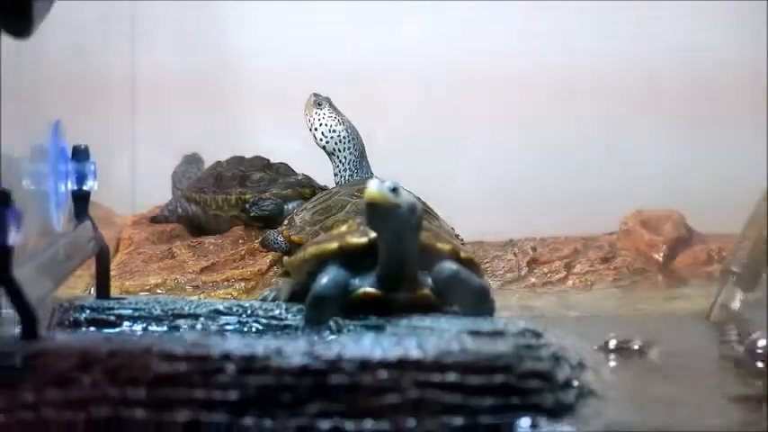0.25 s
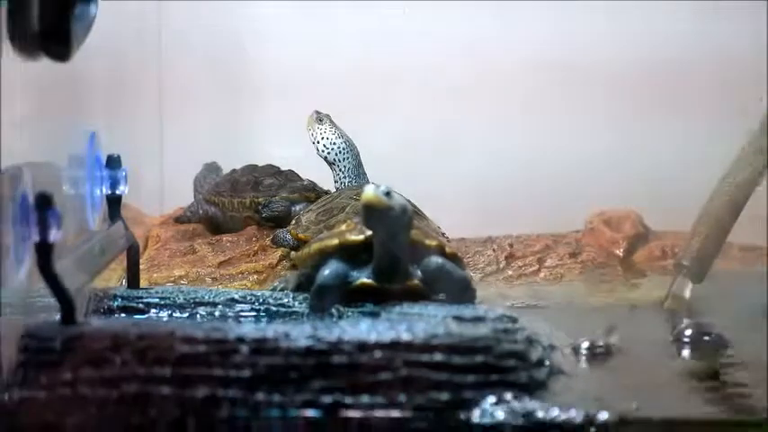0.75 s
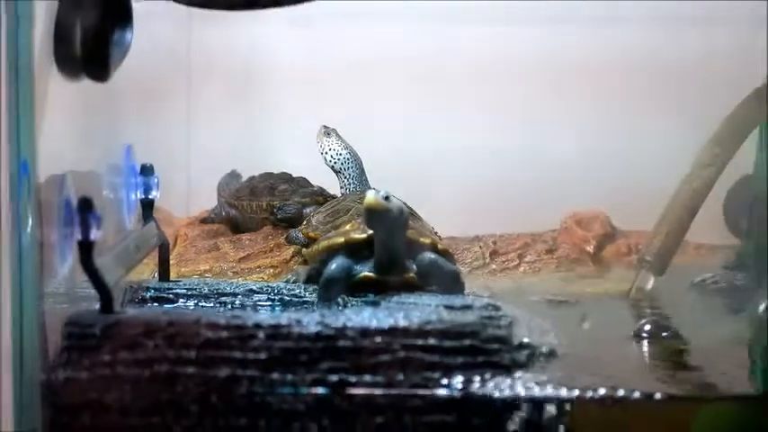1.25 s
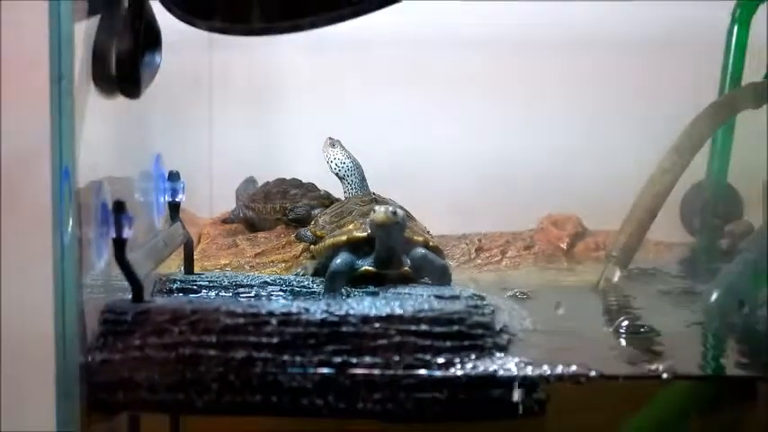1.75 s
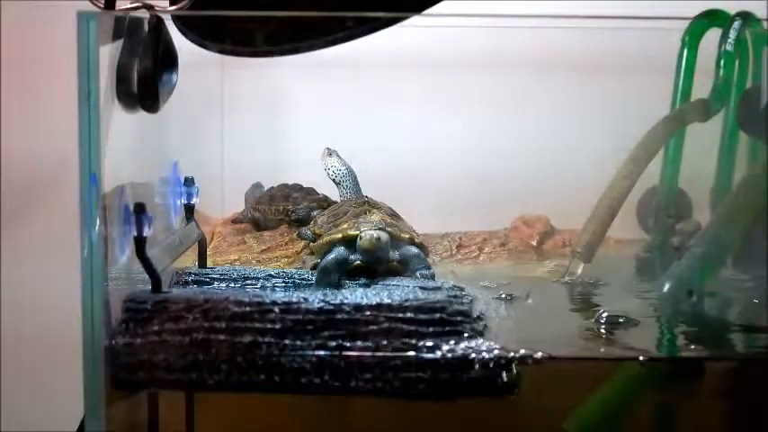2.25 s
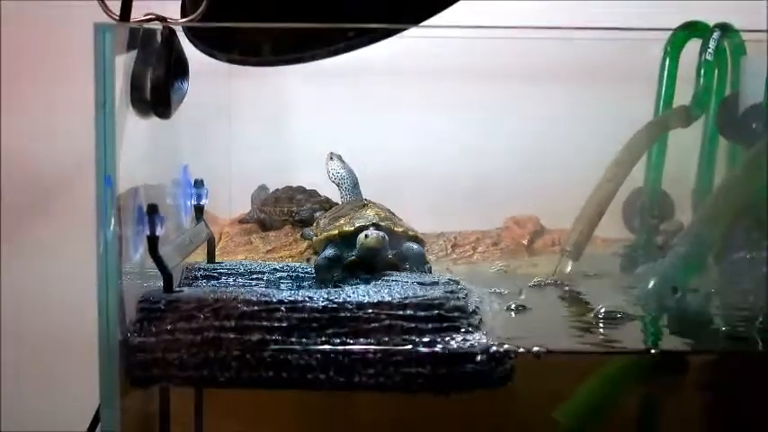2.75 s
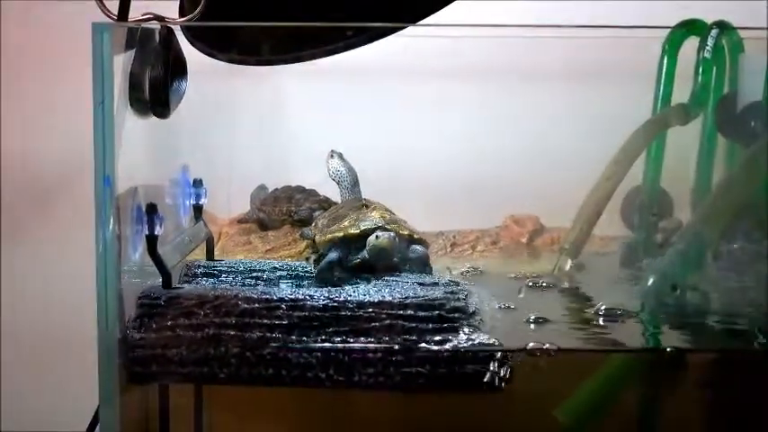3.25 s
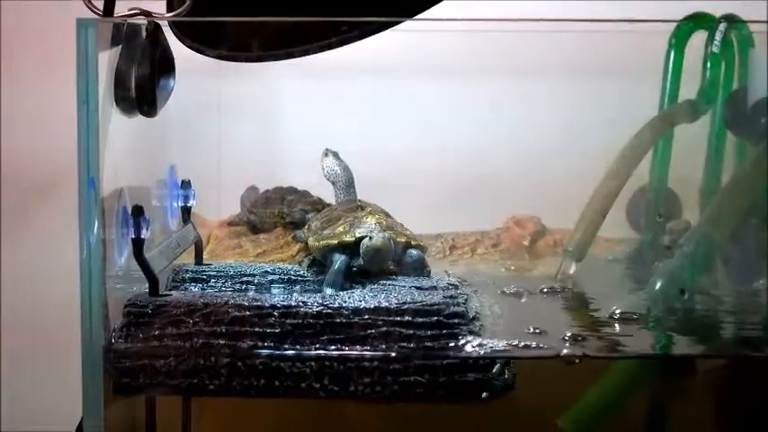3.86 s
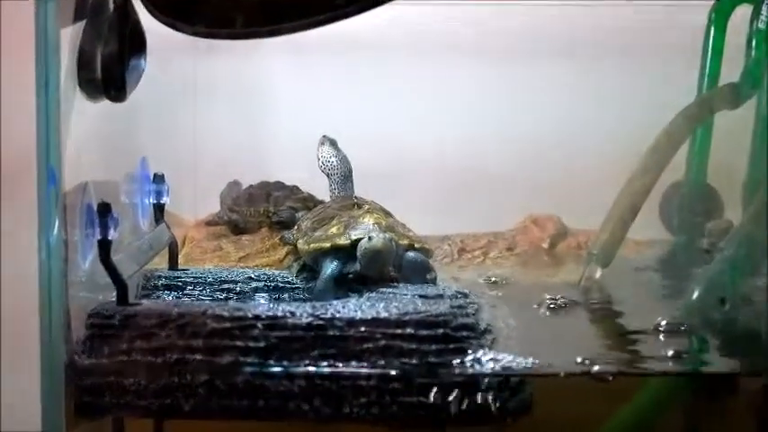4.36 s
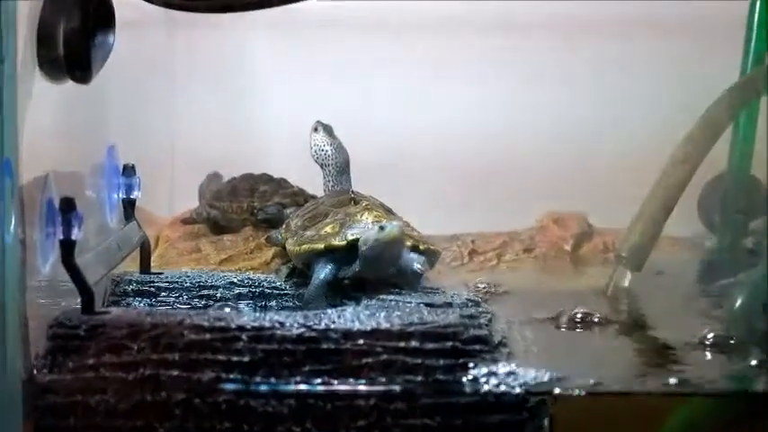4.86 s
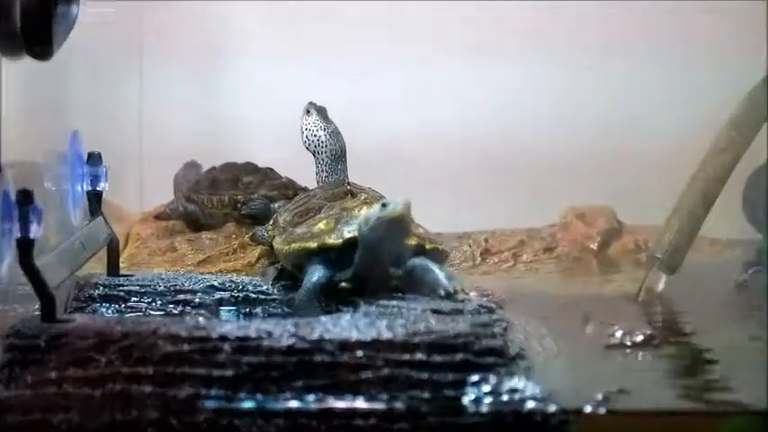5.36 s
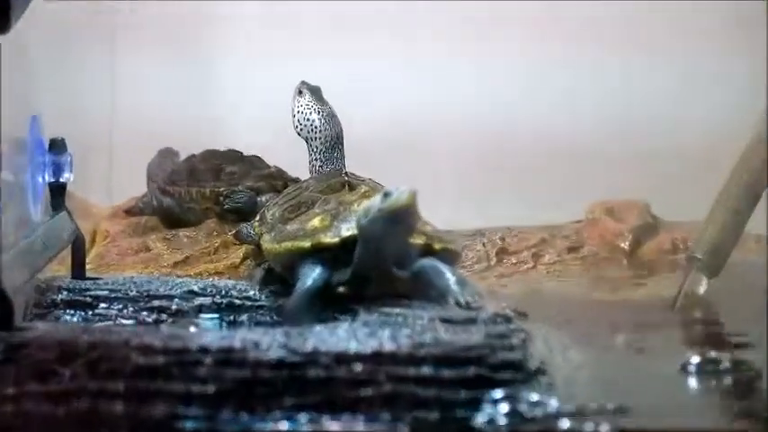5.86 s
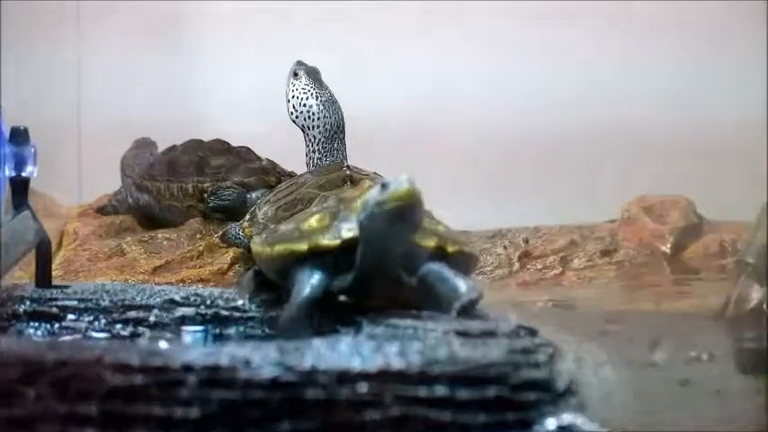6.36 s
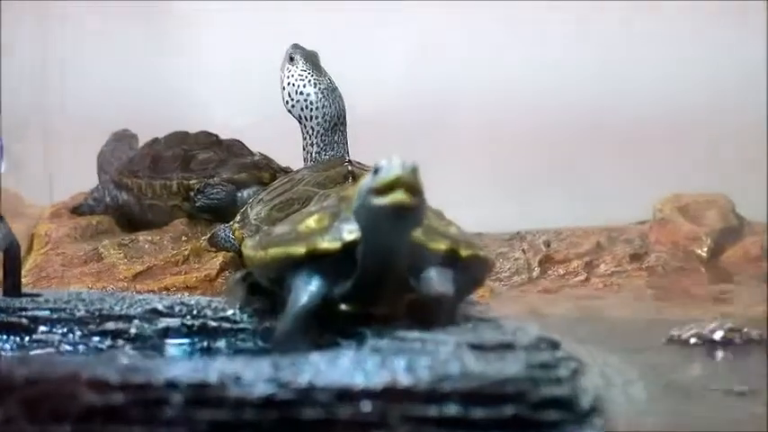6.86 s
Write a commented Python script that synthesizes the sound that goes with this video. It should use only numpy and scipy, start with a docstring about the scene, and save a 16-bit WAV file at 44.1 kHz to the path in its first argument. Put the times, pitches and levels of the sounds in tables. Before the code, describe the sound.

Indoors, close to a glass turtle tank, a filter stream pours continuously into water. A low pump hum and soft rumble lie under a wash of trickling, hollow bubble plops and bright tiny plinks. Droplets tick and patter, froth fizzes. Around the middle the splashing surges, the sound dips for an instant, and one hard dry click follows; then the trickle simply carries on.

```python
"""Filter stream in a glass turtle tank

Indoors, a filter returns water to the tank over the mains hum of its pump and a thin electrical whine.
Shaped noise makes the rumble and wash; trapped bubbles ring as short gliding tones that echo in the glass.
Droplets tick and patter as tiny damped impacts, and froth sprays bursts of crackling hiss.
Midway the sound drops out for a moment, and a sharp click, a cluster of damped tones, follows."""
import sys
import numpy as np
from scipy import signal
from scipy.fft import rfft, irfft
from scipy.io import wavfile
from scipy.ndimage import uniform_filter1d

SR = 44100
rng = np.random.default_rng(int(sys.argv[2]) if len(sys.argv) > 2 else 0)


def unload_wav(signal):
    """Save mono or channel-first audio to the path in sys.argv[1] as 16-bit WAV at rate SR, clipped to [-1, 1]."""
    wavfile.write(
        sys.argv[1],
        SR,
        np.round(np.clip(np.atleast_2d(signal).T, -1, 1) * 32767).astype(np.int16),
    )


N = 313110  # length in samples

# pump hum: mains_multiple, level_db, left_minus_right_db, waver_db
HUM_HARMONICS = [(1, -61.5, 22, 2), (2, -53, 0, 0.76), (4, -56.5, 2.5, -0.4), (5, -67, -4, -1.5),
                 (6, -61.5, -26, .5), (7, -49, 3, 0.5), (8, -67.5, 9, .5), (9, -62, -33, -1),
                 (10, -54, -1, 1.6), (11, -57.5, 6, 1), (12, -59.5, -13, .5), (14, -58, -1.5, 0.2)]
MAINS_HZ, WHINE_HZ = 59.99, 15734
# strength of the splashing over time: time_s, strength_db
SPLASH_STRENGTH = [(0, 2), (.8, 0.9), (1.5, 1.2), (2.8, 1.1), (3.5, 4.5), (3.68, 1), (4.4, 0.65),
                   (5.9, 2.1), (6.55, 0.5), (7.1, 0.5)]
# colour of the filter and room rumble: frequency_hz, relative_density_db (per Hz)
RUMBLE_COLOUR = [(20, -40), (55, 2), (90, -8.5), (155, 3), (200, -1), (250, 0.5), (340, -5), (460, -7),
                 (550, -5), (625, -7.5), (700, -1.5), (765, -15), (832, -1.5), (885, -10.5), (980, -8),
                 (1300, -12.5), (2500, -36.5)]
# colour of the churning water before the tank resonances: frequency_hz, relative_density_db (per Hz)
CHURN_COLOUR = [(100, -10), (400, -3.5), (780, -3.5), (1150, 1.5), (1450, -4), (2200, -2.5), (2550, -8),
                (2950, -13.5), (3300, -16), (4000, -10.5), (5200, -12.5), (6400, -9), (9000, -11.5),
                (12700, -16), (13800, -50), (16000, -35)]
# resonances of the air space in the tank: centre_hz, width_hz, lift_db
TANK_RESONANCES = [(1220, 75, 1), (1703, 94, 5.5), (2090, 97, 3), (2520, 120, 2.5)]
# likeness of the two noise channels: frequency_hz, correlation (-1 to 1)
CHANNEL_LIKENESS = [(60, -0.62), (160, -0.64), (280, -0.65), (450, -0.26), (1400, 0.064), (3100, 0.68),
                    (5000, 0.41), (6800, -0.038), (15000, -0.17)]
# side from which the churning water is heard: frequency_hz, left_minus_right_db
WATER_SIDE = [(300, 13.5), (1100, -1), (2100, 0), (3100, 0), (4000, 1), (6500, 0.5), (10000, -3.5),
              (12000, -3), (14000, 37)]
# strength of the dull patter of drops: time_s, level_db
PATTER_LEVEL = [(0, -57), (1.2, -66), (2.8, -60), (3.3, -59.5), (6.4, -58), (7.1, -78)]
# side from which the lesser bubbles are heard: pitch_hz, left_minus_right_db
BUBBLE_SIDE_BY_PITCH = [(1000, 12), (1700, 7), (2400, 1), (5500, 0), (10000, -2.5)]
# the loudest bubbles: start_s, pitch_hz, relative_level_db, left_minus_right_db, t60_s
LOUD_BUBBLES = [(.057, 1970, -54, 5, .06), (.133, 1660, -50.5, 4, .1), (.187, 5600, -50, -2, 0.21),
                (.336, 8760, -57, -5, 0.17), (.504, 7260, -57, -1, .15), (.737, 1650, -54, 8, 0.084),
                (.807, 2090, -51, 1, 0.14), (.815, 1216, -48, 4, 0.084), (.997, 5830, -52, 1, 0.17),
                (1.088, 1515, -56, 4, .08), (1.418, 4980, -55, 0, .2), (1.539, 1690, -54, 3, 0.065),
                (1.555, 2030, -55, 4, .06), (1.563, 1174, -46, 1, 0.15), (1.593, 5030, -58, 4, 0.14),
                (1.661, 1730, -54, 6, 0.11), (1.803, 4610, -55, 1, 0.21), (1.851, 5850, -51.5, -1, 0.18),
                (1.899, 1555, -54, 2, 0.1), (1.927, 1163, -48, 6, .12), (2.146, 2360, -53, 5, .07),
                (2.39, 1640, -47.5, 8, 0.093), (2.477, 11350, -56, 1, 0.17), (2.509, 2430, -47.5, 7, 0.061),
                (2.543, 1220, -50, 2, 0.12), (2.591, 2085, -51.5, 0, 0.088), (2.777, 1167, -48, 7, .13),
                (2.7915, 1000, -45.5, 1, 0.043), (2.826, 1700, -49.5, 6, 0.053), (2.828, 6910, -56, 0, .2),
                (2.848, 5840, -55, 2, .17), (3.006, 1990, -55, 1, .07), (3.04, 4700, -58, -2, .17),
                (3.116, 11760, -58, -1, .15), (3.133, 1632, -40, 5, 0.065), (3.168, 4920, -54, -1, .17),
                (3.184, 2040, -49.5, 0, .12), (3.309, 2120, -51, 4, 0.083), (3.321, 4840, -54, 1, 0.2),
                (3.343, 1205, -46, 6, 0.2), (3.431, 1650, -53, 7, 0.099), (3.433, 2130, -53, 3, 0.12),
                (3.506, 1200, -38, 7, 0.08), (3.524, 1197, -44.5, 3, .06), (3.67, 1280, -53.5, 0, 0.016),
                (3.676, 10500, -50.5, 1, 0.16), (3.886, 8900, -49.5, -3, 0.22),
                (4.2535, 1133, -43, 5, 0.07), (4.268, 1110, -43.5, 0, .07), (4.453, 2150, -50, 1, 0.29),
                (4.539, 2100, -44.5, 2, 0.18), (4.7, 2060, -58, 6, .1), (4.742, 11600, -54, 0, .2),
                (4.804, 8720, -56, -3, 0.17), (4.941, 10500, -54.5, -2, .2), (5.118, 5840, -52.5, 1, .17),
                (5.261, 5360, -53, -1, 0.19), (5.263, 8860, -56, -4, 0.17), (5.307, 1660, -49, 5, 0.15),
                (5.353, 1950, -50, 2, .1), (5.369, 2400, -54, 8, 0.089), (5.586, 1220, -52.5, 2, .16),
                (5.758, 6800, -55, 1, .18), (5.945, 6350, -55.5, 1, 0.25), (5.957, 2060, -53, 7, 0.084),
                (6.032, 1670, -47, 6, .1), (6.047, 5960, -53, 1, 0.12), (6.065, 10750, -55.5, -3, 0.19),
                (6.091, 1660, -52, 11, 0.14), (6.322, 1235, -48, 4, 0.13), (6.323, 1676, -45.5, 9, 0.085),
                (6.355, 2070, -49.5, 1, .12), (6.519, 1670, -48.5, 7, 0.11), (6.638, 997, -43.5, 2, 0.15),
                (6.678, 4930, -51.5, -2, 0.19), (6.724, 10000, -47.5, -3, 0.24), (6.807, 2030, -55, 1, .09),
                (6.821, 4060, -57, 3, 0.15), (6.885, 820, -43, 6, 0.086), (6.907, 830, -43.5, 1, .08),
                (6.959, 4970, -58, 1, 0.17)]
# the loudest droplet ticks: start_s, relative_level_db, pitch_hz, spatter_strength (0 to 1)
LOUD_TICKS = [(0.176, -36, 4400, .4), (0.2255, -36.5, 2600, 0.6), (0.4085, -37, 2380, .8),
              (.434, -40, 2400, .3), (.458, -39.5, 2400, .2), (0.9515, -37, 2400, .5),
              (1.825, -36, 5500, .5), (2.469, -33, 7000, 0.2), (2.476, -34, 7400, .4),
              (3.6632, -39, 3800, 1), (3.685, -43, 2200, .3), (3.937, -39, 2400, .5),
              (4.007, -39, 2200, .1), (4.054, -37, 2200, .2), (4.156, -35.5, 1900, 0.3),
              (4.208, -35, 2100, .1), (4.3055, -37, 2100, 0), (4.713, -37, 2090, .1),
              (4.7568, -38, 2200, .1), (4.819, -39, 2200, .1), (5.773, -41, 2200, .2),
              (5.828, -38, 2300, .1), (5.85, -40, 2270, .1), (5.8768, -34.5, 2300, 0.4),
              (5.9063, -38, 2200, .1), (5.9432, -38, 2300, .1), (5.9665, -40, 2600, .1), (6, -42, 2300, .1)]
# short sprays of fine droplets: start_s, level_db, centre_hz, t60_s
FROTH_SPRAYS = [(0.187, -48, 5670, .22), (0.675, -51, 5000, .24), (1.85, -52, 9000, .24),
                (2.165, -52.5, 8000, 0.26), (2.457, -46, 7400, 0.16), (2.95, -56, 9000, .3),
                (3.04, -50.5, 5000, .24), (3.135, -52, 9000, .15), (3.168, -48, 4400, .24),
                (3.176, -52, 11000, .12), (3.29, -51, 3600, .24), (3.32, -51, 7000, .24),
                (3.617, -50, 11000, .3), (3.66, -49, 12000, .08), (3.674, -42, 12500, .07),
                (3.684, -47, 14500, .06), (3.729, -41, 11500, 0.033), (4.105, -52, 8000, 0.26),
                (5.7, -54, 7500, .4), (5.95, -55, 9000, .24), (6.674, -51, 9000, .24)]
# ringing parts of the sharp click: pitch_hz, relative_level_db, t60_s
CLICK_RINGS = [(880, -39.5, 0.016), (1300, -38, 0.011), (1750, -41, 0.013), (2180, -38, 0.011),
               (3920, -31, 0.0058), (5750, -43, 0.006), (7140, -39.5, 0.005)]
CLICK_S = 3.7368
# the momentary dropout: start_s, end_s
DROPOUT_SPAN = (3.548, 3.617)
CUTOFF_HZ = 15950


def amp(db):
    """Decibels to gain."""
    return 10 ** (np.asarray(db) / 20)


def unit(x):
    """Scales to rms 1."""
    return x / np.sqrt(np.mean(x ** 2) + 1e-20)


def read(points, hz):
    """Reads a table on a log-frequency axis."""
    f, value = np.transpose(points)
    return np.interp(np.log(hz + 1), np.log(f + 1), value)


def curve(rows):
    """Joins rows of (time_s, value) by straight lines."""
    return np.interp(np.arange(N) / SR, *np.transpose(rows))


def pan(left_minus_right_db):
    """Left and right gains of equal total power."""
    return unit(amp([[left_minus_right_db / 2], [-left_minus_right_db / 2]]))


def add(mix, start_s, sound):
    """Adds a stereo sound to the mix at its start time."""
    part = mix[:, max(round(start_s * SR), 0):][:, :sound.shape[1]]
    part += sound[:, :part.shape[1]]


def drift(top_hz, count=24):
    """Random wander of rms 1: sines over a decade up to top_hz, the slower ones stronger."""
    t = np.linspace(0, N / SR, 1500)
    f = np.geomspace(top_hz / 10, top_hz, count)[:, None]
    sines = np.sin(2 * np.pi * (f * t + rng.random((count, 1))))
    wave = (sines / np.sqrt(f)).sum(0)
    return unit(np.interp(np.arange(N) / SR, t, wave))


def noise(colour_db, patchy_db, size):
    """Coloured stereo noise, with time-frequency patches that come and go in both channels."""
    hz = np.fft.rfftfreq(size, 1 / SR)
    a, b, c, d, patches = rng.standard_normal((5, len(hz), 4 * N // size + 5))
    patches = uniform_filter1d(patches, size=12, axis=0)  # smooth across frequency
    patches = unit(uniform_filter1d(patches, size=10, axis=1))  # and across time
    same = np.clip(read(CHANNEL_LIKENESS, hz), -1, 1)[:, None]
    left = a + 1j * b
    right = same * left + np.sqrt(1 - same ** 2) * (c + 1j * d)
    spectrum = np.array([left, right]) * amp(colour_db(hz)[:, None] + patchy_db * patches)
    return unit(signal.istft(spectrum, nperseg=size, noverlap=size * 3 // 4)[1][:, :N])


def echoes(sound, t60, direct):
    """A direct sound and its dense reflections from glass and water, different at each ear."""
    t = np.arange(SR // 5) / SR
    walls = rng.standard_normal((2, len(t))) * amp(-60 * t / t60)
    walls /= np.linalg.norm(walls, axis=1, keepdims=True)
    walls[:, 0] += direct
    return signal.fftconvolve(sound[None], walls, axes=1)


def bubble(hz, cycles=10.8, shrink=0.99, rise=0.11, t60=0.21, direct=0.45, shade_hz=1800):
    """A trapped bubble swells and rings briefly (small ones for fewer cycles), its pitch rising."""
    t = np.arange(SR // 20) / SR
    age = t * hz / (cycles * min(1, 1700 / hz) ** shrink)  # in decay times
    glide_hz = hz * (1 + rise * (np.tanh(age / 2) - .35))
    swell = 1 - np.exp(-2 * age)
    ring = np.exp(-age) * swell * np.sin(2 * np.pi * np.cumsum(glide_hz) / SR)
    # the rim of the tank shades the direct treble
    heard = echoes(ring, t60, direct * min(1, shade_hz / hz) ** 2)
    return heard / np.linalg.norm(heard, axis=1, keepdims=True)  # energy 1 per ear


def tick(hz, cycles=1.0, knock_share=0.23, t60=0.19, direct=0.7):
    """A tiny impact: a damped snap, a decaying 1800 Hz knock and a faint echo; peak 1."""
    t = np.arange(SR // 100) / SR
    snap = np.exp(-t * hz / cycles) * np.sin(2 * np.pi * hz * t)
    knock = knock_share * np.exp(-t / 0.00092) * np.sin(2 * np.pi * 1800 * t)
    onset = 1 - np.exp(-2 * t * hz)
    heard = echoes((snap + knock) * onset, t60, direct)
    return heard / abs(heard).max()


def scatter(grain, per_s, spread_db):
    """Repeats a grain at random moments; most are small, a few large; rms 1."""
    count = N // 100
    place, chance, size, side = rng.random((4, count))
    kept = chance < per_s * N / SR / count
    height = amp(spread_db * np.minimum(-np.log(size), 3)) * kept
    train = np.zeros((2, N))
    train[:, (place * N).astype(int)] = height * np.array([np.sqrt(0.16 + side), np.sqrt(1.2 - side)])
    return unit(signal.oaconvolve(train, grain, axes=1)[:, :N])


def spatter(decay_s, low_hz, high_hz):
    """The broad snap of an impact: band-passed noise, a little different at each ear; peak 1."""
    t = np.arange(SR // 100) / SR
    rush = rng.standard_normal(len(t)) + .5 * rng.standard_normal((2, len(t)))
    band = signal.butter(1, [low_hz, min(high_hz, SR / 2.2)], "band", fs=SR)
    snap = signal.lfilter(*band, rush * t / decay_s * np.exp(-t / decay_s))
    return snap / abs(snap).max()


def water_db(hz):
    """Spectrum of the water, lifted at the resonances of the tank."""
    lift = sum(db / (1 + (2 * (hz - f) / width) ** 2) for f, width, db in TANK_RESONANCES)
    return read(CHURN_COLOUR, hz) + lift


def lean(hz):
    """Left and right gains for the water at these pitches."""
    return amp(np.array([.5, -.5])[:, None] * read(WATER_SIDE, hz))


def pump(left_lead_rad=0.99):
    """Mains harmonics from the pump, wavering a little."""
    t, out = np.arange(N) / SR, np.zeros((2, N))
    for order, db, side_db, waver_db in HUM_HARMONICS:
        phase = 2 * np.pi * (order * MAINS_HZ * t + rng.random()) + np.array([[left_lead_rad], [0]])
        out += amp(db + waver_db * drift(6.8)) * pan(side_db) * np.sin(phase)
    return np.sqrt(2) * out  # sine peaks to rms levels


def whine(level_db=-79):
    """A thin, steady electrical whine: one high sine, equal in both channels."""
    t = np.arange(N) / SR
    return np.sqrt(2) * amp(level_db) * np.sin(2 * np.pi * WHINE_HZ * t)


def rumble(level_db=-45.0, follow=0.3):
    """Low rush of the filter and the falling stream, swelling a little with the splashing."""
    rush = noise(lambda hz: read(RUMBLE_COLOUR, hz), patchy_db=1.2, size=2048)
    return amp(level_db + follow * curve(SPLASH_STRENGTH)) * rush


def swarm(pitches_hz, per_s, spread_db):
    """Scattered bubbles at many pitches, weighted by the colour and side of the water; rms 1."""
    total = 0
    for hz in pitches_hz:
        weight = amp(water_db(hz)) * np.sqrt(hz) * lean(hz)
        total = total + weight * scatter(bubble(hz), per_s, spread_db)
    return unit(total)


def trickle(wash_db=-52.5, gurgle_db=-57, fizz_db=-61, spray_db=-65,
            low_follow=0.78, surge_db=0.54, flutter_db=1.0):
    """The stream churns the surface: a wash, swarms of large and small bubbles, and spray."""
    flow_db = curve(SPLASH_STRENGTH) + surge_db * drift(12)
    wash = noise(water_db, patchy_db=2.0, size=512)
    wash = irfft(rfft(wash) * lean(np.fft.rfftfreq(N, 1 / SR)), N)
    gurgle = swarm(np.geomspace(750, 2600, num=20), per_s=7, spread_db=2.0)
    fizz = swarm(np.geomspace(3500, 13000, num=26), per_s=16, spread_db=4.5)
    spray_hz = np.geomspace(4200, 11000, num=8)
    spray = unit(sum(scatter(tick(hz, direct=0.81), per_s=46, spread_db=4.5) for hz in spray_hz))
    deep = amp(wash_db) * wash + amp(gurgle_db) * gurgle
    bright = amp(fizz_db) * fizz + amp(spray_db) * spray
    flutter = amp(flutter_db * drift(50))  # the stream lands in uneven lumps
    return flutter * (amp(low_follow * flow_db) * deep + amp(flow_db) * bright)


def patter(side_db=4):
    """Drops land with dull little knocks, each a short damped tone."""
    pitches_hz = np.geomspace(1500, 2400, num=5)
    drops = sum(scatter(tick(hz, cycles=2.1, knock_share=0), per_s=12, spread_db=2.5) for hz in pitches_hz)
    return amp(curve(PATTER_LEVEL)) * pan(side_db) * unit(drops)


def bubbling(low_hz=946.4, high_hz=2362, per_s=34, level_db=-62.5, spread_db=3.5, count=290):
    """Lesser bubbles overlap at loosely even intervals, louder when the splashing is strong."""
    out, flow_db = np.zeros((2, N)), curve(SPLASH_STRENGTH)
    wait, size, strength = rng.random((count, 3)).T
    starts_s = np.cumsum(2 * wait) / per_s
    pitches_hz = low_hz * (high_hz / low_hz) ** size
    offsets_db = spread_db * (2 * strength - 1)
    for s, hz, db in zip(starts_s, pitches_hz, offsets_db):
        if s < N / SR:
            ring = bubble(hz, cycles=17.2, rise=0.052, direct=1.5, t60=0.16)
            gain = amp(level_db + db + flow_db[int(s * SR)]) * np.sqrt(SR / 20)  # level over 50 ms
            add(out, s, gain * pan(read(BUBBLE_SIDE_BY_PITCH, hz)) * ring)
    return out


def plinks(level_db=-2.0, clear=0.35, shade_hz=2700, deep_hz=1550, swell_s=0.0027, rise=0.018,
           echo_cycles=8, width=0.85):
    """Single bubbles stand out: a rising note in echoes, tiny ones mostly echo, the biggest broad gulps."""
    out, t = np.zeros((2, N)), np.arange(SR // 5) / SR
    for s, hz, db, side_db, t60 in LOUD_BUBBLES:
        glide_hz = hz * (1 + rise * (np.tanh(10 * t / t60) - .5))
        envelope = amp(-60 * t / t60) * (1 - np.exp(-t / swell_s))
        note = envelope * np.sin(2 * np.pi * np.cumsum(glide_hz) / SR)
        tight = min(1, hz / deep_hz) ** 1.4  # big bubbles ring for fewer cycles
        echo = bubble(hz, cycles=echo_cycles * tight, shrink=0.76, t60=t60, direct=0.17)
        middle, side = echo[:, :len(t)]
        blur = np.array([middle + width * side, middle - width * side])
        share = np.clip(clear * tight * min(1, shade_hz / hz) ** 2.2, 0, 1)  # power of the clear note
        heard = unit(np.sqrt(share) * unit(note) + np.sqrt(1 - share) * unit(blur))
        gain = amp(level_db + db) * np.sqrt(SR / 20 / len(t))  # energy referred to 50 ms
        add(out, s, gain * pan(side_db) * heard)
    return out


def ticks(level_db=-0.5, side_db=5.0, cycles=1.9, snap_hz=2400):
    """Single droplets strike close by: a brief ring, and a thin broad spatter when they burst."""
    out = np.zeros((2, N))
    for s, db, hz, burst in LOUD_TICKS:
        gain = amp(level_db + db) * pan(side_db)
        add(out, s, gain * tick(hz, cycles=cycles * min(1, snap_hz / hz), knock_share=0.19, direct=1.4))
        add(out, s, gain * burst * spatter(decay_s=0.0009, low_hz=2500, high_hz=8000))
    return out


def sprays(octaves=0.57, rise_s=0.00095, crackle_db=4):
    """Bursting froth throws up a crackling hiss, band-shaped noise that dies away in the tank."""
    out, t = np.zeros((2, N)), np.arange(SR // 5) / SR
    hz = np.fft.rfftfreq(len(t), 1 / SR) + 1
    for s, db, centre_hz, t60 in FROTH_SPRAYS:
        colour = np.exp(-.5 * (np.log2(hz / centre_hz) / octaves) ** 2)
        crackle = amp(crackle_db * unit(uniform_filter1d(rng.standard_normal(len(t)), size=30)))
        hiss = unit(irfft(rfft(crackle * rng.standard_normal((2, len(t)))) * colour))
        add(out, s, amp(db - 60 * t / t60) * (1 - np.exp(-t / rise_s)) * hiss)
    return out


def click(level_db=6.0, side_db=3, rise_s=0.00019, direct=1.1, snap_db=-26):
    """One hard, dry click very near: a broad noise snap and a short ring of damped tones."""
    out, t = np.zeros((2, N)), np.arange(SR // 20) / SR
    ring = np.zeros(len(t))
    for k, (hz, db, t60) in enumerate(CLICK_RINGS):
        ring += (-1) ** k * amp(db - 60 * t / t60) * np.sin(2 * np.pi * hz * t)  # alternating polarity
    heard = echoes(ring * (1 - np.exp(-t / rise_s)), t60=0.016, direct=direct) / direct
    add(out, CLICK_S, amp(level_db) * pan(side_db) * heard)
    snap = spatter(decay_s=0.00061, low_hz=2000, high_hz=9000)
    add(out, CLICK_S, amp(snap_db) * pan(side_db) * snap)
    return out


def scene():
    """Pump, whine, filter and water together, with the click."""
    steady = pump() + whine() + rumble() + trickle() + patter() + bubbling()
    return steady + plinks() + ticks() + sprays() + click()


def record(dry, dropout_db=-15.0, treble_left_db=-16, hiss_db=-70):
    """The level falls away for a moment, the treble less, over a faint steady hiss; then the band limit."""
    t = np.arange(N) / SR
    inside = (t > DROPOUT_SPAN[0]) & (t < DROPOUT_SPAN[1])
    gap = uniform_filter1d(1. * inside, size=100)  # softened edges
    treble = dry - uniform_filter1d(dry, size=13, axis=1)
    heard = dry * amp(dropout_db * gap) + amp(treble_left_db) * gap * treble
    heard = heard + amp(hiss_db) * rng.standard_normal(dry.shape)
    lowpass = signal.firwin(801, CUTOFF_HZ, window=("kaiser", 9), fs=SR)
    return signal.oaconvolve(heard, lowpass[None], "same", axes=1)


dry = scene()
out = record(dry)
unload_wav(out)
```